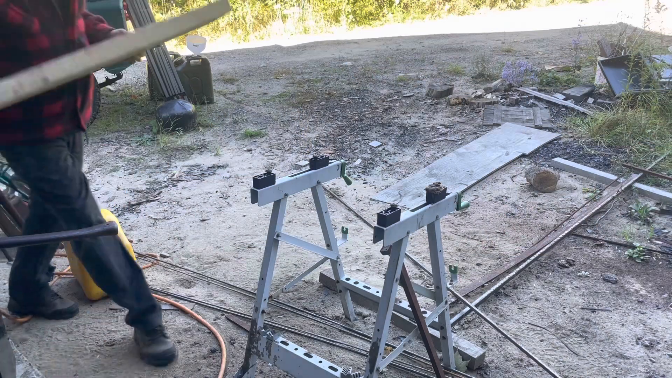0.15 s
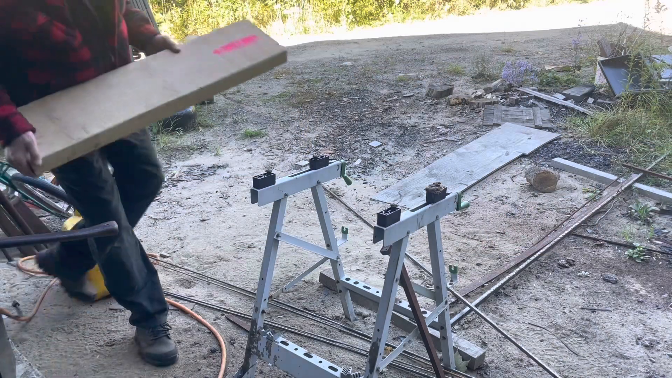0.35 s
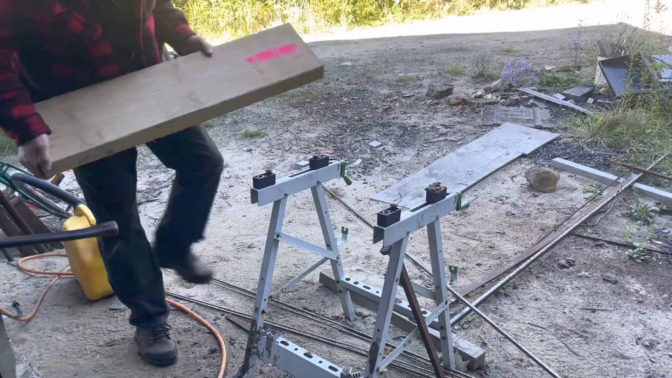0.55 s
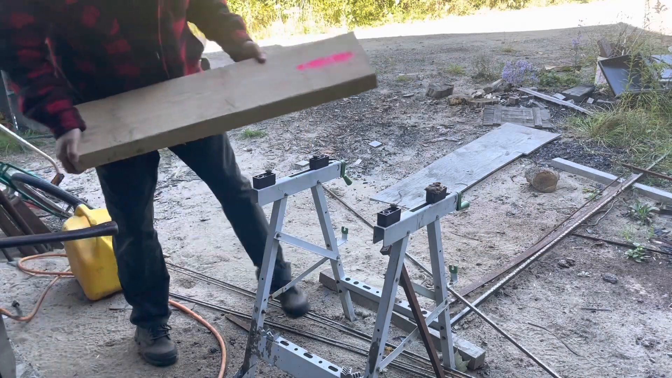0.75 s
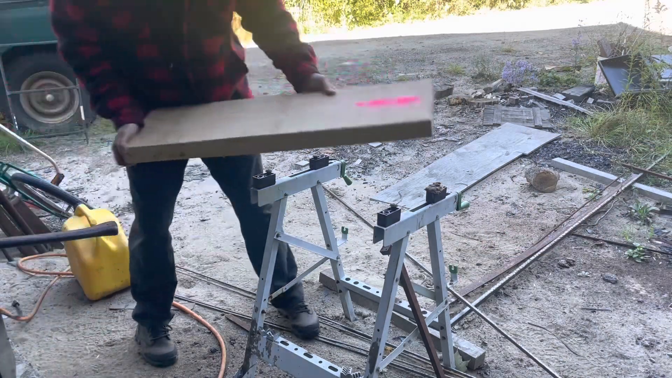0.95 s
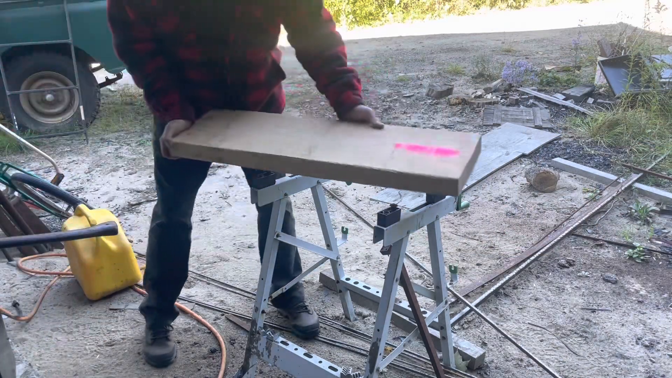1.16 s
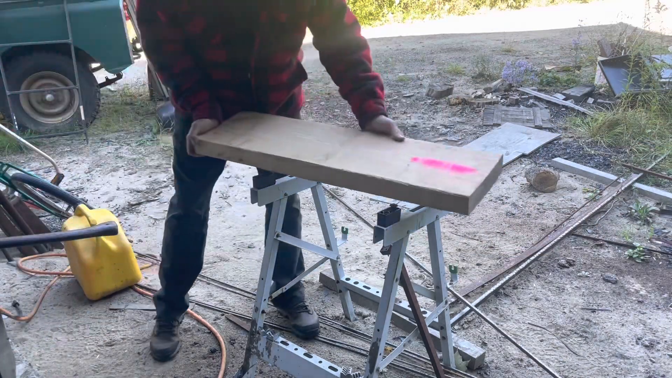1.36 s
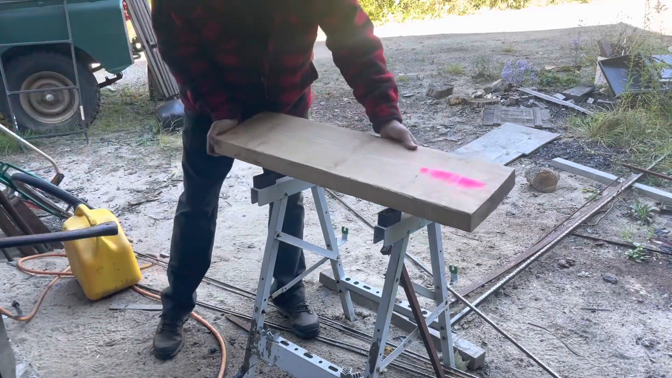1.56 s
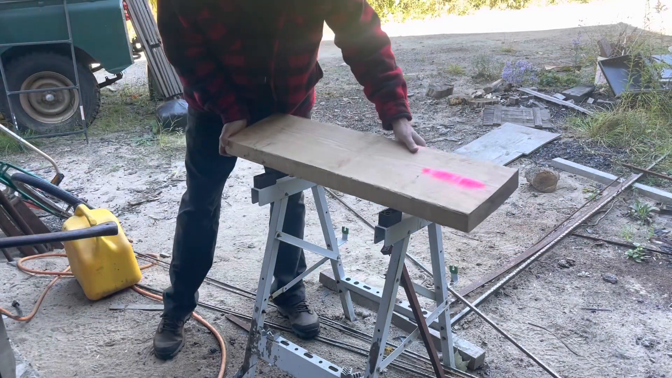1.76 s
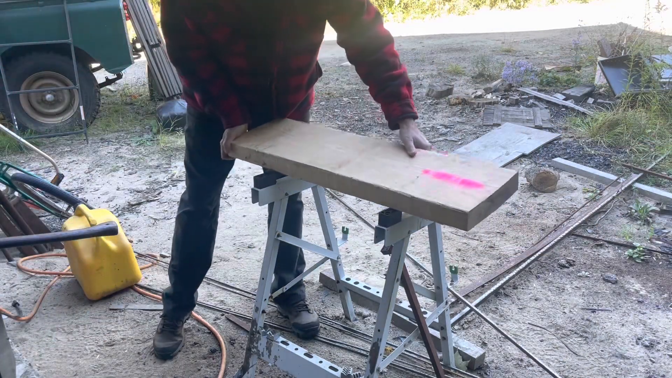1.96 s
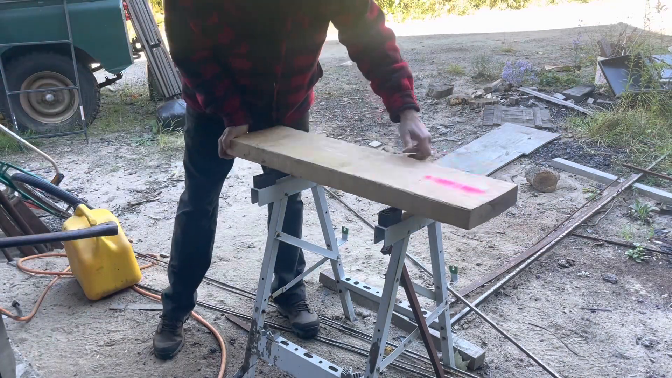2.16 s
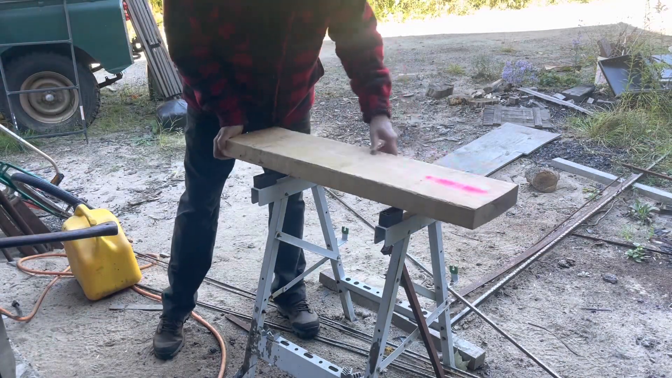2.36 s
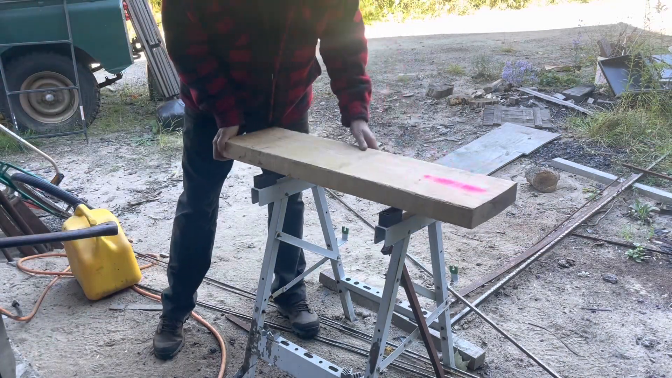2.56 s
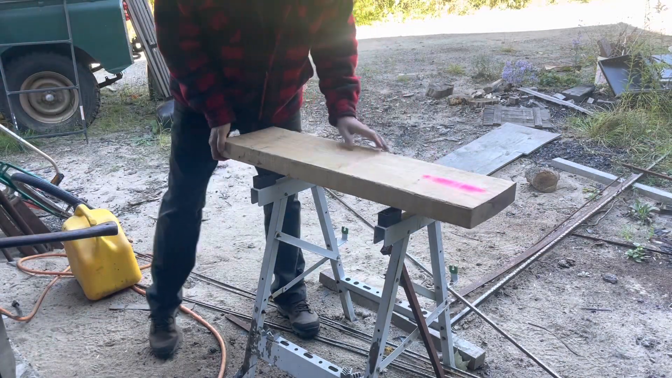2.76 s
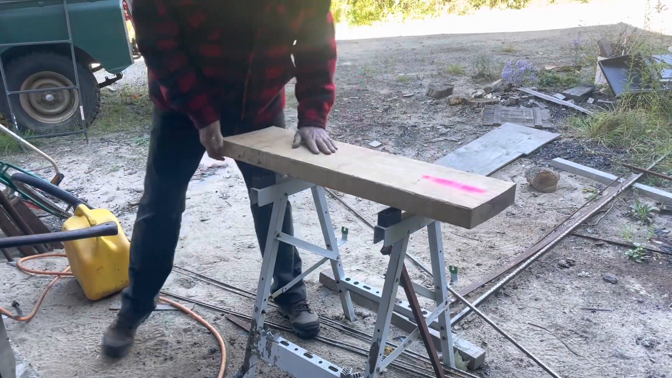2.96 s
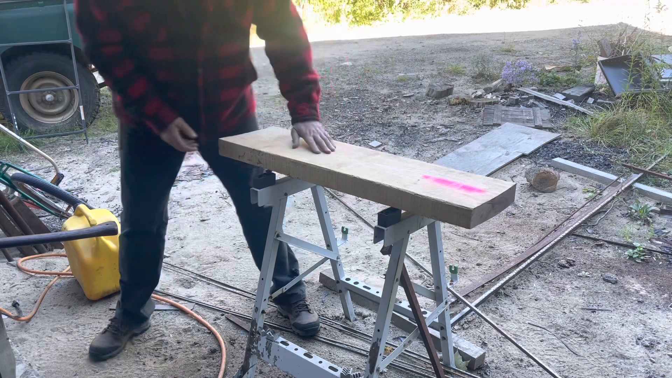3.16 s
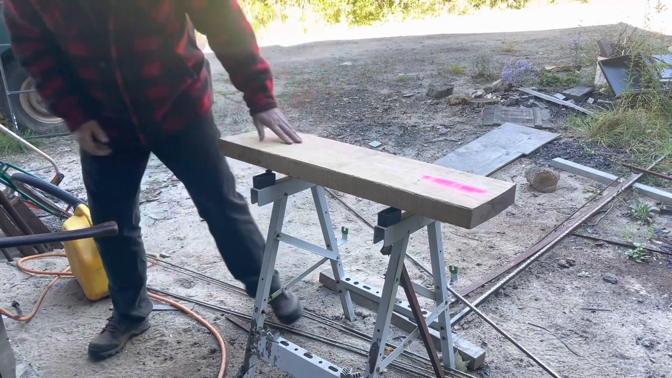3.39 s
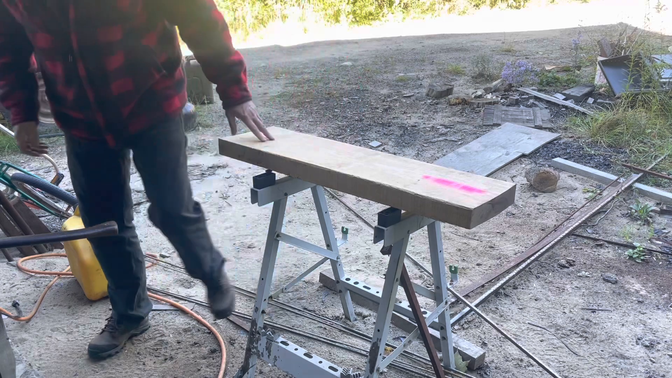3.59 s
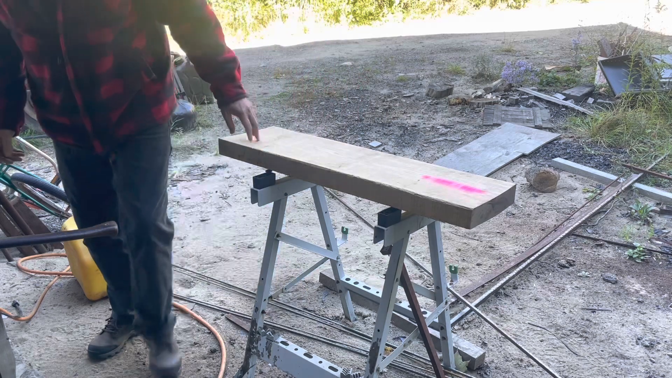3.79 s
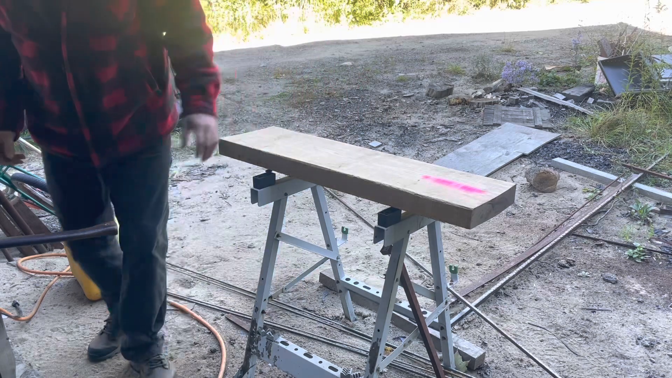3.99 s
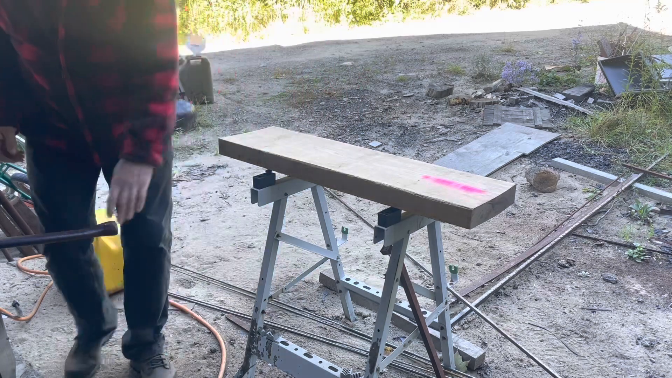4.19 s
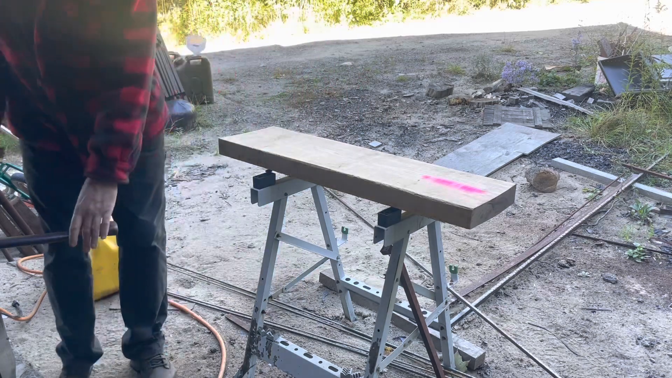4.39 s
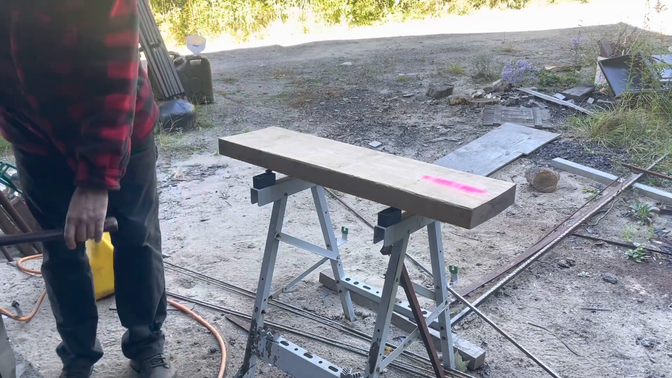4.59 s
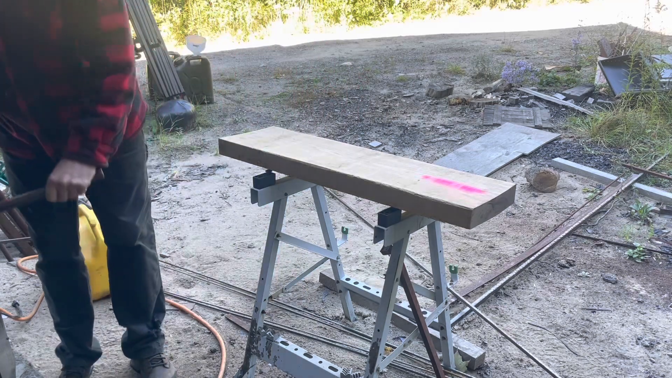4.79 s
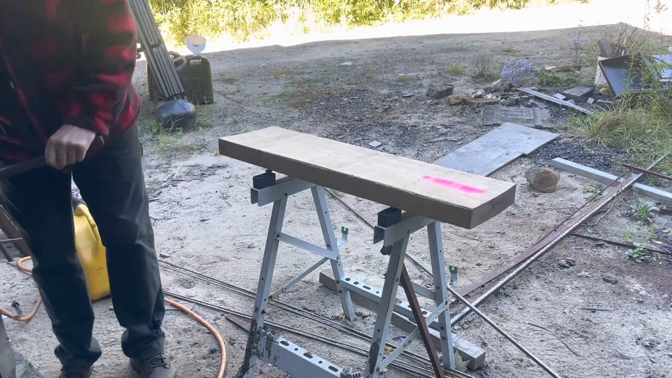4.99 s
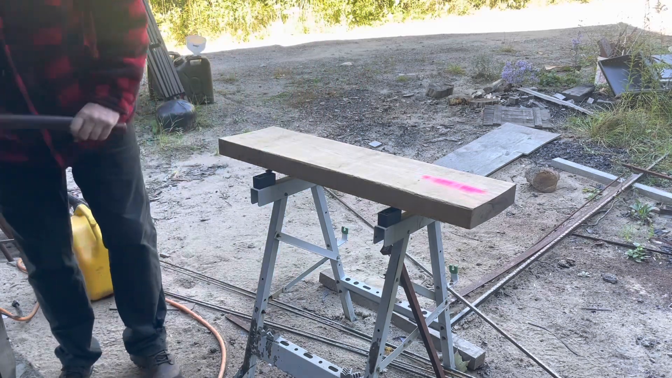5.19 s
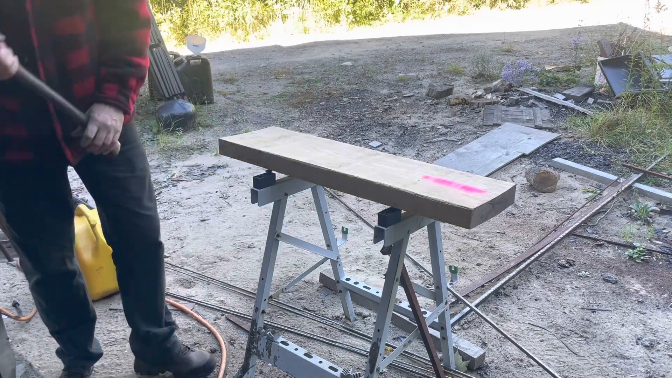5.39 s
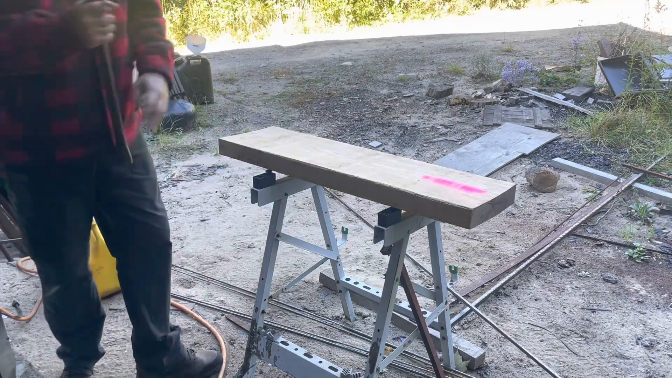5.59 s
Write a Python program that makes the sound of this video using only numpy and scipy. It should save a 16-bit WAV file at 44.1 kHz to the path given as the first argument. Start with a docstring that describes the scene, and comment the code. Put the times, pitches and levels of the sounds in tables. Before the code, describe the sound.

Outdoor yard: a low boot thud, wood cracking and knocking on steel trestles, gravel scuffs, then hollow metallic bumps with wind buffeting the microphone.

```python
"""Plank on steel sawhorses

A thick plank is set down and shifted on folding steel sawhorses in a gravel yard, a few metres from a phone.
Boots thud and crunch around it, then a tool handle is pulled from a rack; gusts buffet the microphone ports.
Wood, steel, gravel and rack are banks of ringing modes driven by dying rattles of tiny random contacts;
yard air, shuffling and gusts are shaped noise, and a diffuse tail returns the yard's reflections."""
import sys
import numpy as np
from scipy import signal
from scipy.fft import rfft, irfft, next_fast_len
from scipy.io import wavfile
from scipy.ndimage import uniform_filter1d

SR = 44100
rng = np.random.default_rng(int(sys.argv[2]) if len(sys.argv) > 2 else 0)


def int16_out(signal):
    """Quantize to a 16-bit WAV file."""
    q = np.round(np.clip(np.atleast_2d(signal).T, -1, 1) * 32767)
    wavfile.write(sys.argv[1], SR, q.astype(np.int16))


N = 248724
SPAN = 32768  # samples rendered for one blow, and length of the yard's tail
FAVOUR_DB = 7  # most that a favoured metal mode stands over the rest
SPREAD_DB = 1.9  # unevenness of tiny contacts

# Broad modes of rough contact. Each row: frequency in Hz, level in dB, t60 in seconds.
ROUGH_MODES = [(314, -1, 0.0071), (696, 6.5, 0.0024), (1390, 5, 0.0021), (2610, 3, 0.0025),
               (4200, 5, 0.0022), (5250, 14.5, 0.00023)]
# Short, high modes of loose hinges and grit. Each row: frequency in Hz, level in dB, t60 in seconds.
SIZZLE_MODES = [(6400, -7.5, 0.0011), (10240, 15, 0.0005), (12860, -5.5, 0.0021)]
# Modes of a soft thud. Each row: multiple of the thud pitch, level in dB, t60 in seconds.
THUD_MODES = [(0.997, -3, 0.13), (1.5, -5, 0.045), (2.3, -12, 0.043)]


def gain(db):
    """Amplitude factor for a level in dB."""
    return 10 ** (np.asarray(db) / 20)


def curve(rows, column):
    """Straight lines over time through one column of a table that starts with seconds."""
    rows = np.array(rows)
    return np.interp(np.arange(N) / SR, rows[:, 0], rows[:, column])


def across(points, size):
    """A (Hz, value) table read at every bin of a transform, on a log frequency axis."""
    hz, value = np.transpose(points)
    bin_hz = np.fft.rfftfreq(size, 1 / SR)
    return np.interp(np.log(bin_hz + 1), np.log(hz + 1), value)


def colour(noise, points):
    """Noise shaped by a spectrum, rms 1."""
    shaped = irfft(rfft(noise) * gain(across(points, N)), N)
    return shaped / np.std(shaped)


def walk(rate):
    """Random levels held 1 / rate s, then smoothed twice over that time into a slow drift."""
    hold = int(SR / rate)
    steps = np.repeat(rng.standard_normal(N // hold + 1), hold)
    smooth = uniform_filter1d(uniform_filter1d(steps, hold), hold)
    return 3.06 * smooth[:N]


def grains(shape, spread_db, share):
    """Dense tiny contacts of very uneven size, present in a given share of the samples."""
    size = gain(spread_db * rng.exponential(size=shape))
    return rng.standard_normal(shape) * size * (rng.random(shape) < share)


def chattering_contacts(count):
    """Loose parts chatter: one row of contacts for each blow, in clumps a few ms long."""
    bounce_db = 3.5
    contacts = grains((count, SPAN // 2), SPREAD_DB, 0.4)
    clumps = np.repeat(rng.standard_normal((count, SPAN // 512)), 256, axis=1)
    clumps[:, :512] = 1  # the first contact is always firm
    return contacts * gain(bounce_db * uniform_filter1d(clumps, size=128, axis=1))


def mode_strengths(count, hz, db, favour_hz, slope_db, most_db):
    """Where a blow lands sets its mode strengths: random, and weaker per octave from the favoured pitch."""
    spot_db = db + 1.3 * rng.standard_normal((count, len(hz)))
    if favour_hz is not None:
        octaves = np.abs(np.log2(hz / favour_hz[:, None]))
        spot_db = spot_db - np.minimum(slope_db * octaves, most_db)
    return gain(spot_db) * (-1.) ** np.arange(len(hz))  # opposite signs leave no holes between neighbours


def strike(times, peak_db, t60, modes, rise_s, favour_hz=None, slope_db=0, most_db=np.inf, tune=None, blow=0):
    """A hard hit (blow: its size against the whole rattle) and a dying rattle of contacts ring the modes."""
    hold = 0.11  # share of its t60 for which a rattle keeps full strength
    out, t = np.zeros(N + SPAN), np.arange(SPAN) / SR
    hz, db, ring = np.transpose(modes)
    contacts = chattering_contacts(len(times))
    spot = mode_strengths(len(times), hz, db, favour_hz, slope_db, most_db)
    turn = np.exp(-2j * np.pi * np.fft.rfftfreq(SPAN))[:, None]  # delay of one sample
    for k, start in enumerate(times):
        if k == 0 or tune is not None:
            pitch = hz * (1 if tune is None else tune[k])
            pole = np.exp((2j * np.pi * pitch - np.log(1000) / ring) / SR)
            bank = pole.imag * turn / ((1 - pole * turn) * (1 - pole.conj() * turn))
        decay = 1000. ** -np.clip(t / max(t60[k], .004) - hold, 0, None)
        push = np.clip(t / rise_s, 0, 1) * decay
        rattle = contacts[k] * push[:SPAN // 2]
        rattle[0] = blow * np.sqrt(np.sum(rattle ** 2))
        sound = irfft(rfft(rattle, SPAN) * (bank @ spot[k]), SPAN)
        loudest = np.sqrt(uniform_filter1d(sound ** 2, size=1024).max())  # short-term rms
        i = int(start * SR)
        out[i:i + SPAN] += sound * gain(peak_db[k]) / loudest
    return out[:N]


def ports(sound, diffuse_db):
    """The two ports in the phone body hear the direct sound out of step; the yard returns it differently to each."""
    # Balance of the ports. Each row: frequency in Hz, left minus right in dB.
    port_pan = [(150, -1), (700, 1), (1290, 4), (2380, -0.5), (4400, 6), (15000, -3.5)]
    # Phase between the ports. Each row: frequency in Hz, lead of the left port in radians.
    port_phase = [(100, 0), (700, .9), (2200, .7), (4700, 1.3), (7100, -1.7), (7800, -2.95), (9100, -3.3),
                  (12400, -5.9), (13800, -6.28)]
    # Reflected share, ahead of diffuse_db. Each row: frequency in Hz, level in dB.
    diffuse = [(60, -18.5), (200, -5), (700, -2), (3000, -8.5), (7400, -5), (8400, -54), (14000, -42)]
    echo_t60_s = 0.29
    size = next_fast_len(N + SPAN)
    t = np.arange(SPAN) / SR
    tail = rng.standard_normal((2, SPAN)) * 1000. ** (-t / echo_t60_s) * (t > .001)
    tail = rfft(tail / np.sqrt(np.sum(tail ** 2, axis=1, keepdims=True)), size)
    skew = gain(across(port_pan, size) / 2) * np.exp(.5j * across(port_phase, size))
    direct = np.array([skew, 1 / skew])
    reflected = tail * gain(across(diffuse, size) + diffuse_db)
    return irfft(rfft(sound, size) * (direct + reflected), size)[:, :N]


def yard_air():
    """Steady shaped noise whose level drifts very slowly."""
    # Yard spectrum. Each row: frequency in Hz, relative level in dB per Hz.
    yard_colour = [(25, -2), (60, 3.5), (130, -17.5), (300, -6.5), (1000, -16.5), (3000, -15),
                   (6500, -23.5), (8500, -15), (11500, -9), (12800, -18), (13500, -57)]
    level_db = -68.5 + 0.21 * walk(0.33)
    return gain(level_db) * colour(rng.standard_normal(N), yard_colour)


def wind():
    """Slow eddies, partly separate at each port, and a few single thumps."""
    # Gusts on the ports. Each row: time in seconds, level in dB of the part common to both ports.
    gusts = [(0, -94), (.12, -68.5), (2.8, -108), (3.13, -53.5), (4.14, -65), (4.22, -39), (4.44, -74),
             (5.32, -35.5), (5.64, -53)]
    # Gust spectrum. Each row: frequency in Hz, relative level in dB per Hz.
    gust_colour = [(35, 6.5), (60, 2.5), (90, -4.5), (140, -17.5), (300, -68)]
    # Single buffets. Each row: start in seconds, reference level in dB, pitch in Hz, push t60 in seconds.
    buffets = [(4.198, -41.5, 74, 0.033), (5.197, -62, 58, 0.063), (5.327, -33, 92.5, 0.072),
               (5.451, -39, 79, 0.065)]
    both, left, right = (colour(rng.standard_normal(N), gust_colour) for _ in range(3))
    eddies = gain(curve(gusts, 1)) * (both + 0.56 * np.array([left, right]))
    s, db, hz, t60 = np.transpose(buffets)
    common = strike(s, db - 3, t60, THUD_MODES, 0.039, tune=hz)
    opposed = strike(s, db - 12, t60, THUD_MODES, 0.039, tune=hz)
    return eddies + common + opposed * np.array([[1], [-1]])


def shuffle():
    """Grit dragged under soles and cloth rubbing, in patches: dull and bright grains of noise."""
    # Boots and clothes. Each row: time in seconds, level of the dull part in dB, bright part against it in dB.
    patches = [(0, -70.5, 1), (.64, -71, -2.5), (1.1, -61.5, -5.5), (1.37, -59, -5), (1.44, -68.5, -3),
               (2.5, -65, -8.5), (3.35, -63.5, -4), (4.54, -70, -11), (5.4, -66, -16)]
    # Both spectra: frequency in Hz, relative level in dB.
    dull_colour = [(100, 5), (250, 0.5), (600, -1.5), (1500, -1), (4000, -11.5), (8000, -24.0)]
    bright_colour = [(2000, -15.0), (4000, 3.5), (7000, -3.5), (11500, -1.5), (13000, -2.5), (14000, -38.0)]
    dull = colour(grains(N, SPREAD_DB, 0.3), dull_colour)
    bright = colour(grains(N, 0.77, 0.24), bright_colour)
    level = gain(curve(patches, 1) + 1.2 * walk(24))
    return level * (dull + gain(curve(patches, 2)) * bright)


def boot(s, crunch_db, thud_db, grit_db, t60, thud_hz, crunch_hz):
    """The sole ticks and thuds at its own pitch while gravel crunches under it."""
    tick_hz, tick_db, tick_t60_s = 3500, -7.5, 0.015  # level against the crunch
    each = np.ones(len(s))
    thud = strike(s, thud_db, 0.3 * t60 * each, THUD_MODES, .003, tune=thud_hz * each, blow=1.2)
    tick = strike(s, crunch_db + tick_db, tick_t60_s * each, ROUGH_MODES, 0.0013, tick_hz * each, slope_db=23)
    crunch = strike(s, crunch_db, t60 * each, ROUGH_MODES, 0.003, crunch_hz * each, slope_db=12, blow=.15)
    grit = strike(s, grit_db, 0.6 * t60 * each, SIZZLE_MODES, 0.00056, blow=.35)
    return thud + tick + crunch + grit


def boots():
    """Steps crunch low; scuffs hiss high and jostle steel rods on the ground."""
    # Boot steps. Each row: start in seconds, crunch in dB, ground thud in dB, grit in dB,
    # crunch t60 in seconds (thud and grit take a share of it), thud pitch in Hz.
    steps = [(0.112, -58, -68, -54.5, 0.68, 103), (0.266, -58, -57, -59.5, 0.17, 149),
             (.859, -51, -49.5, -62, 0.041, 250), (.873, -37, -27.5, -52.5, 0.21, 170.8),
             (.905, -59, -30.5, -40.5, 0.31, 122), (2.929, -70, -57.5, -58, 0.28, 175),
             (3.054, -59, -60.5, -89, 0.26, 115), (3.113, -53.5, -73, -82, 0.068, 80.6),
             (3.195, -58, -51, -59.5, 0.29, 185), (3.284, -53.5, -60, -53, 0.41, 145),
             (3.865, -57, -54.5, -63.5, 0.45, 86), (4.005, -56, -77, -88, 0.098, 82)]
    # A boot dragged round through the gravel. Each row: start in seconds, crunch, ground thud and grit in dB.
    scuffs = [(3.307, -58, -54, -45), (3.444, -48.5, -59, -35.5), (3.478, -57, -42.5, -47),
              (3.502, -74, -42.5, -46), (3.55, -78, -49.5, -44)]
    # Steel rods on the ground. Each row: frequency in Hz, level in dB, t60 in seconds.
    rod_modes = [(3300, -5, .03), (3950, 0, .03), (4680, 0, .025), (5660, -3, .02), (7000, -6, .015)]
    step_crunch_hz = 884
    scuff_t60_s, scuff_thud_hz, scuff_crunch_hz = 0.38, 165.3, 4940
    rods_db = 2.5  # against the crunch of a scuff
    s, crunch_db = np.transpose(scuffs)[:2]
    walking = boot(*np.transpose(steps), step_crunch_hz)
    dragging = boot(*np.transpose(scuffs), scuff_t60_s, scuff_thud_hz, scuff_crunch_hz)
    rods = strike(s, crunch_db + rods_db, np.full(len(s), scuff_t60_s), rod_modes, .001)
    return walking + dragging + rods


def handle():
    """A handle pulled from a rack: the rack drums, the tube scrapes and clinks, with a sizzle on top."""
    # Scrapes and bumps in the rack. Each row: start in seconds, body, scrape, clink and sizzle in dB,
    # base rattle t60 in seconds (clink and sizzle take a share), favoured body and tube pitches in Hz.
    pulls = [(4.572, -55, -85, -85, -75, 0.18, 479, 2160), (4.615, -53, -54, -53, -67, 0.32, 480, 4780),
             (4.697, -43, -58, -56.5, -48.5, 0.13, 543, 3520),
             (4.859, -30, -36.5, -44.5, -34.5, 0.36, 500, 4200),
             (4.914, -39, -43.5, -43.5, -33, 0.16, 510, 4770), (5.006, -39, -64, -80, -67, 0.21, 790, 2000),
             (5.024, -32, -34, -43.5, -43, 0.16, 398, 4600), (5.058, -48.5, -58, -75, -66, 0.56, 229, 2470),
             (5.246, -61, -70, -59, -42.5, 0.19, 169, 5250),
             (5.293, -48, -48, -59, -46.5, 0.032, 1020, 1960),
             (5.412, -50, -44.5, -54, -70, 0.033, 980, 3650)]
    # Drumming rack. Each row: frequency in Hz, level in dB, t60 in seconds.
    rack_modes = [(151.3, -10.5, 0.43), (229, -2.5, 0.13), (280, -4, 0.039), (376, -0.5, 0.023),
                  (494, 2.5, 0.043), (560, 5.5, 0.022), (782, 4.5, 0.014), (1022, 9, 0.012)]
    # Clinking tube. Each row: frequency in Hz, level in dB, t60 in seconds.
    tube_modes = [(1950, -1, .06), (2800, 0, .07), (3550, -3, .03), (4150, 0, .025), (4780, 0, .07)]
    s, body_db, scrape_db, clink_db, sizzle_db, t60, body_hz, tube_hz = np.transpose(pulls)
    body = strike(s, body_db, t60, rack_modes, 0.006, body_hz, slope_db=5.5)
    scrape = strike(s, scrape_db, t60, ROUGH_MODES, .003, tube_hz, slope_db=4)
    clink = strike(s, clink_db, .7 * t60, tube_modes, .001, tube_hz, slope_db=40, most_db=FAVOUR_DB, blow=.6)
    sizzle = strike(s, sizzle_db, 0.66 * t60, SIZZLE_MODES, 0.0011)
    return body + scrape + clink + sizzle


def plank():
    """Rough wood cracks on steel legs that ring, the plank booms, the trestle rocks on, loose hinges sizzle."""
    # Plank meets trestle. Each row: start in seconds, crack, steel ring, plank boom and hinge sizzle in dB,
    # base rattle t60 in seconds (scaled for all but the crack), favoured steel pitch in Hz.
    knocks = [(1.477, -36.5, -35.5, -39, -42, 0.1, 2195), (1.485, -37.5, -29.5, -38.5, -37, 0.16, 3520),
              (1.539, -40, -40, -47.5, -73, 0.073, 2483), (1.548, -41.5, -48, -69, -75, 0.11, 3520),
              (1.569, -46, -41.5, -50.5, -77, 0.17, 3520), (1.704, -41.5, -42.5, -49, -46, 0.34, 1174),
              (1.7662, -35, -29.5, -60, -49.5, 0.12, 1437), (1.805, -44, -42, -68, -58, 0.13, 2800),
              (1.891, -51, -54, -71, -48, 0.15, 2800), (2.019, -67, -56.5, -86, -82, 0.27, 1174),
              (2.061, -52.5, -54, -101, -78, 0.13, 2800), (2.076, -82, -50.5, -86, -65.5, 1, 890),
              (2.146, -32.5, -36, -43, -37, 0.11, 1600), (2.152, -22, -24, -29.5, -22.5, 0.16, 1620),
              (2.199, -32.5, -35.5, -50, -38, 0.24, 1800), (2.28, -37.5, -35, -51, -49, 0.29, 2800),
              (2.314, -39.5, -35.5, -46, -56, 0.16, 1600), (2.444, -76, -51, -64.5, -76, 0.11, 2800)]
    # Steel legs. Each row: frequency in Hz, level in dB, t60 in seconds.
    steel_modes = [(890, -9, .06), (1174, -5, .06), (1437, -1, .045), (1600, 0, .045), (1690, 0, .045),
                   (1890, -3, .045), (2195, -4, .045), (2483, -1, .04), (2800, -2.5, .06), (3520, -4, .068),
                   (4720, -12, .05), (6450, -15, .05)]
    # Plank. Each row: frequency in Hz, level in dB, t60 in seconds.
    plank_modes = [(115, -4.5, 0.57), (160, 5.5, 0.093), (217.2, -1, 0.22), (275, 3.5, 0.052),
                   (356.6, -3, 0.17), (539, -8.5, 0.025)]
    # Whole trestle rocking. Each row: frequency in Hz, level in dB, t60 in seconds.
    sway_modes = [(45.6, -7, 0.15), (65.6, 31, 0.12), (90, 0.5, 0.049)]
    crack_hz, sway_db = 1740, -5  # sway against boom
    s, crack_db, ring_db, boom_db, sizzle_db, t60, hz = np.transpose(knocks)
    crack = strike(s, crack_db, t60, ROUGH_MODES, 0.0021, np.full(len(s), crack_hz), slope_db=5.0)
    ring = strike(s, ring_db, .7 * t60, steel_modes, .0005, hz, slope_db=80, most_db=FAVOUR_DB, blow=.85)
    boom = strike(s, boom_db, 0.17 * t60, plank_modes, 0.0011, blow=0.82)
    sway = strike(s, boom_db + sway_db, 3.3 * t60, sway_modes, .005)
    hinges = strike(s, sizzle_db, 0.57 * t60, SIZZLE_MODES, 0.0093)
    return crack + ring + boom + sway + hinges


def scene():
    """Yard air is mostly diffuse, the near sources more direct; wind acts on the ports themselves."""
    background = ports(yard_air(), 10.5)
    sources = ports(shuffle() + boots() + handle() + plank(), 0.11)
    return background + wind() + sources


def record(dry):
    """The microphone loses the deepest bass and the highest treble, then the top is cut."""
    # Microphone response. Each row: frequency in Hz, level in dB.
    mic = [(35, -15), (55, 3), (12600, -5), (13600, -13), (16000, -28)]
    top_hz = 16200
    size = next_fast_len(N + SPAN)
    heard = irfft(rfft(dry, size) * gain(across(mic, size)), size)[:, :N]
    top_cut = signal.ellip(8, .2, 70, top_hz, fs=SR, output="sos")
    return signal.sosfilt(top_cut, heard)


dry = scene()
out = record(dry)
int16_out(out)
```